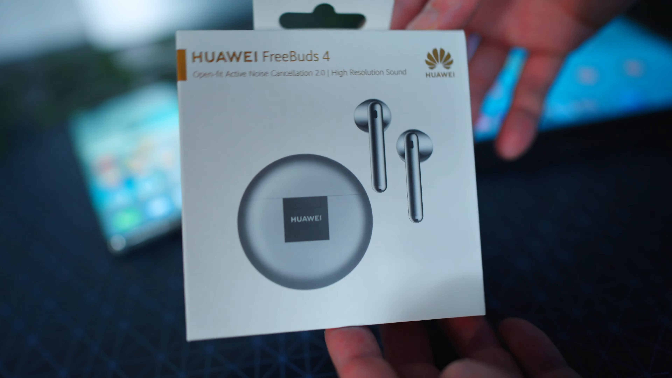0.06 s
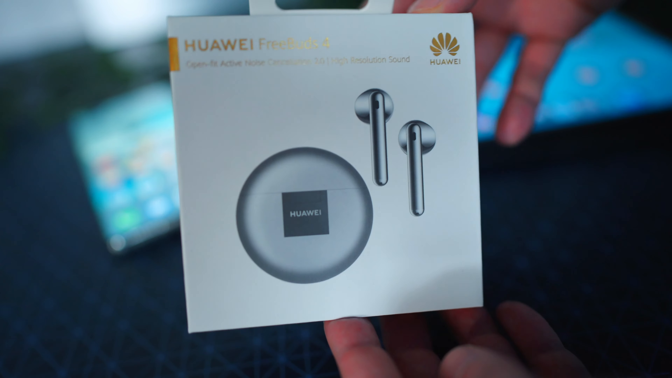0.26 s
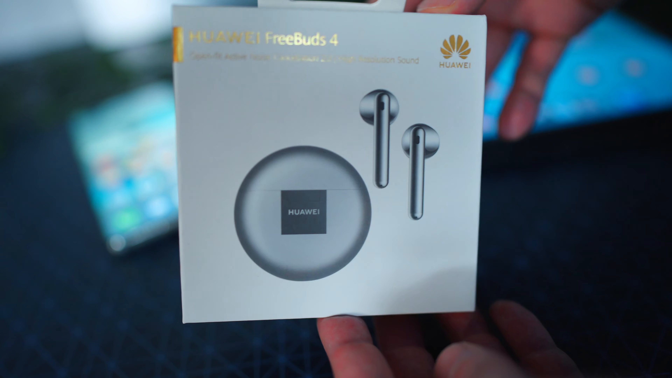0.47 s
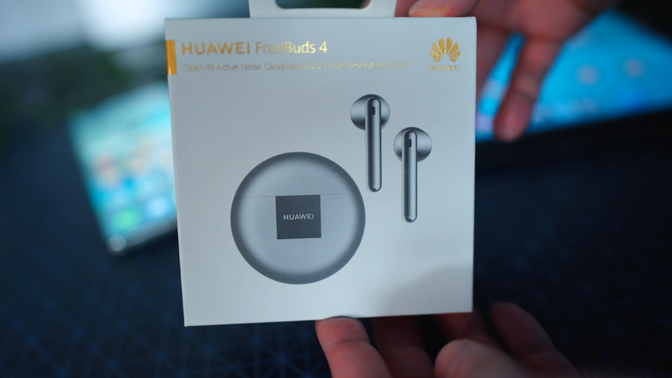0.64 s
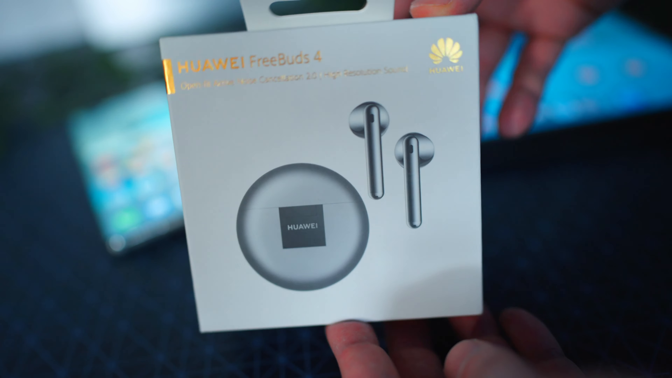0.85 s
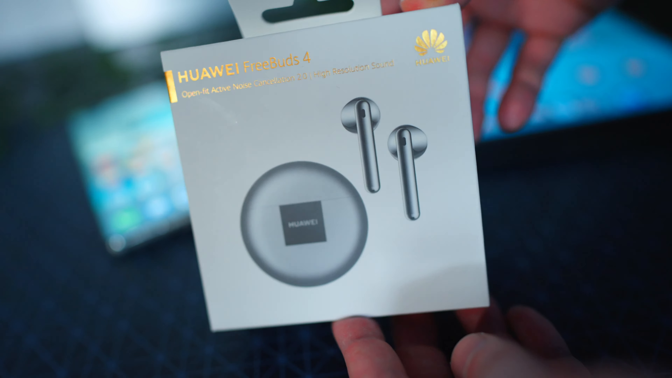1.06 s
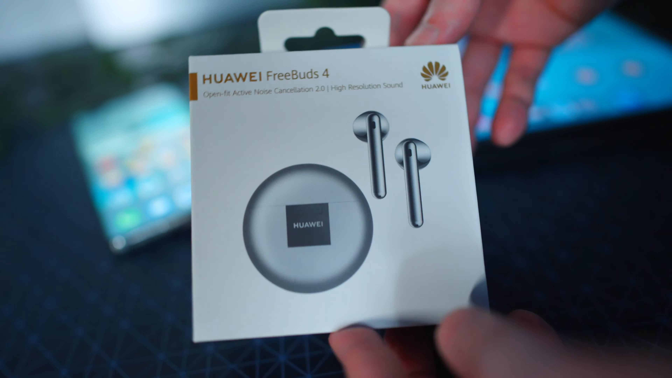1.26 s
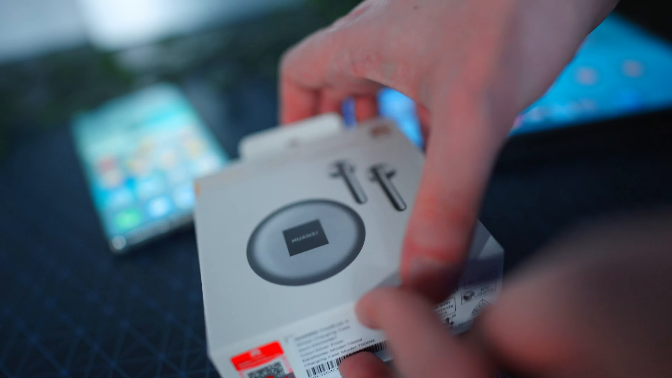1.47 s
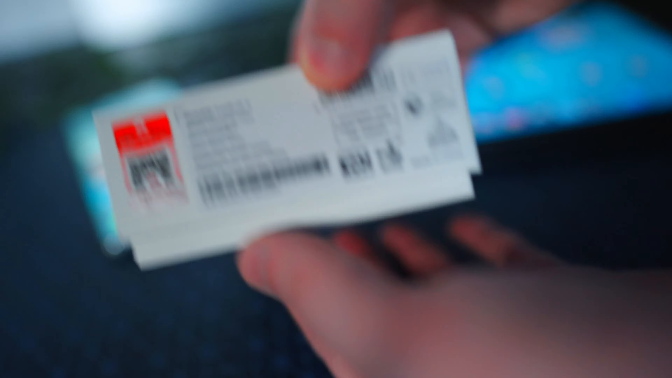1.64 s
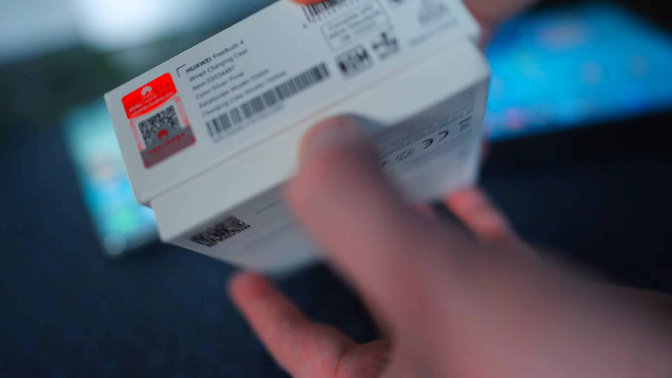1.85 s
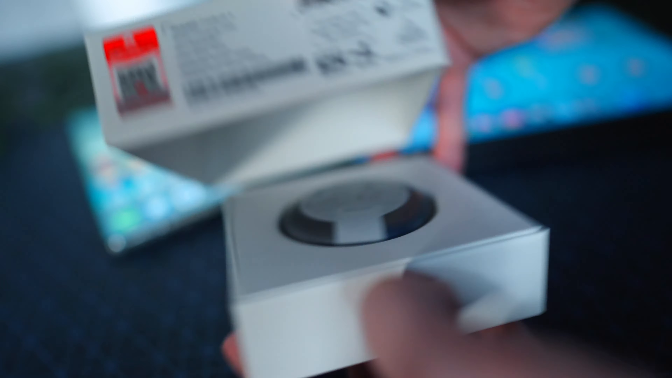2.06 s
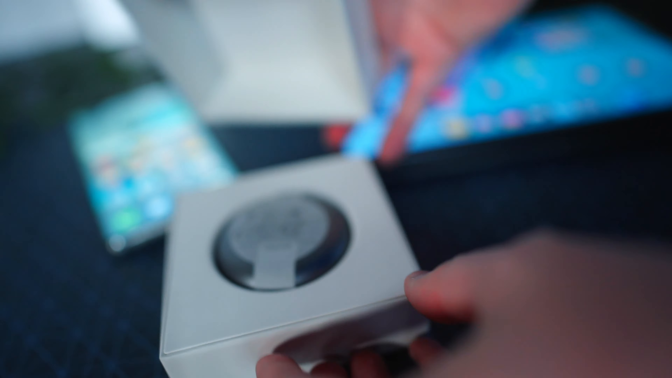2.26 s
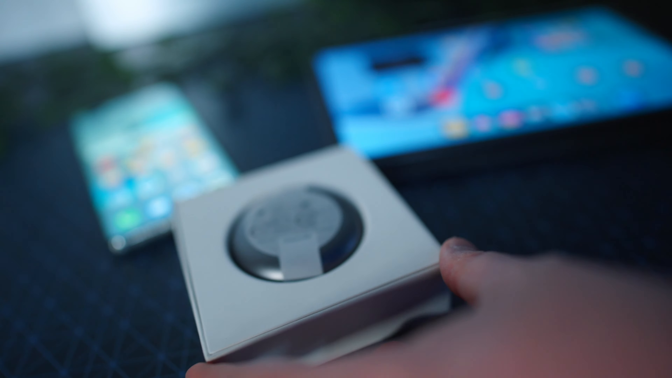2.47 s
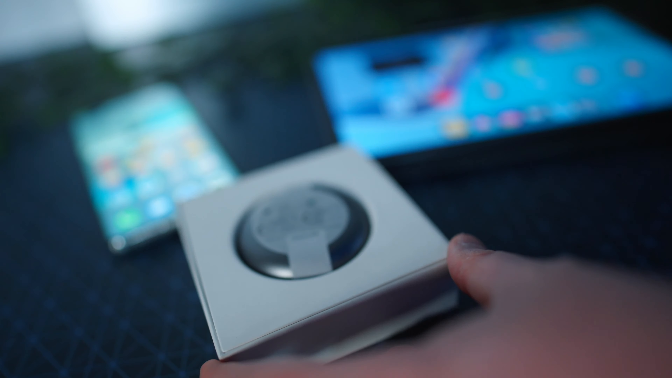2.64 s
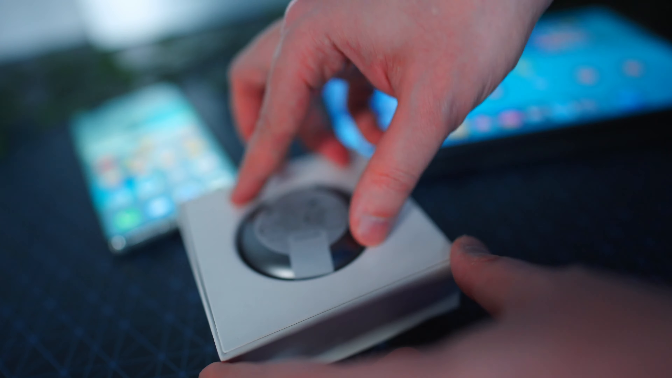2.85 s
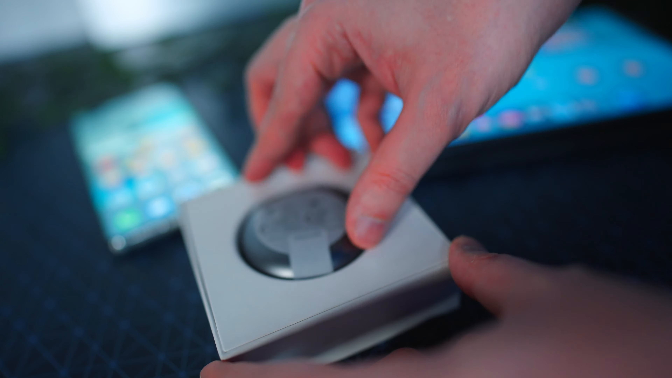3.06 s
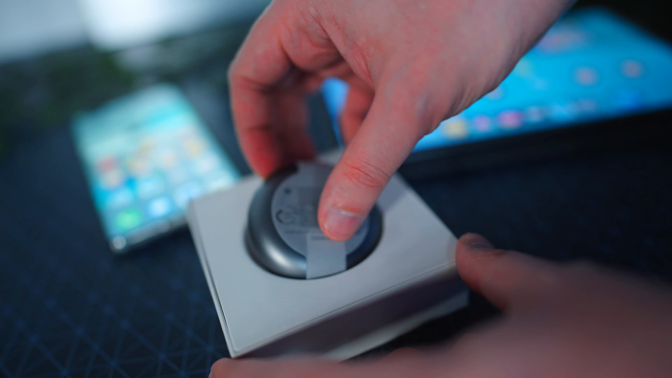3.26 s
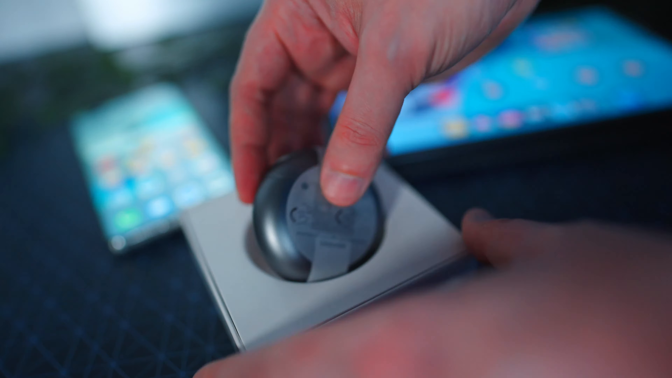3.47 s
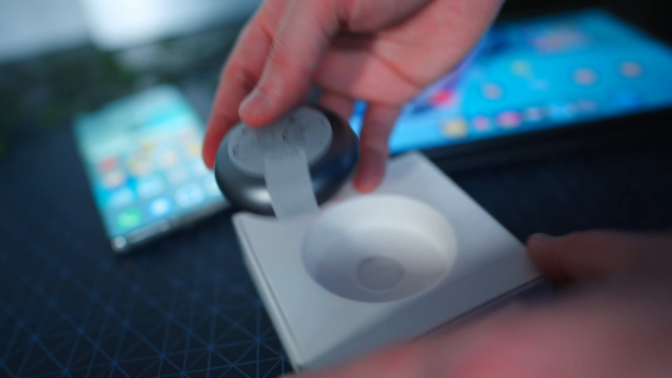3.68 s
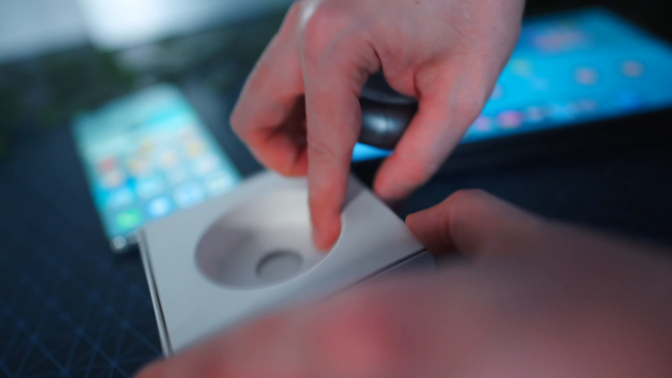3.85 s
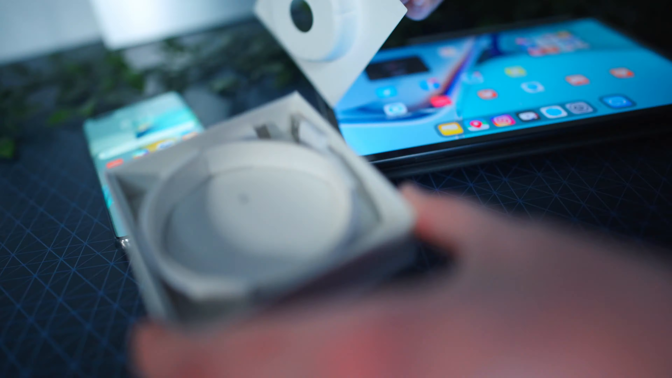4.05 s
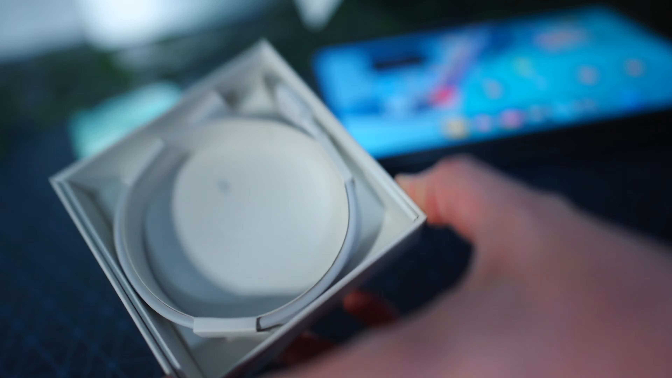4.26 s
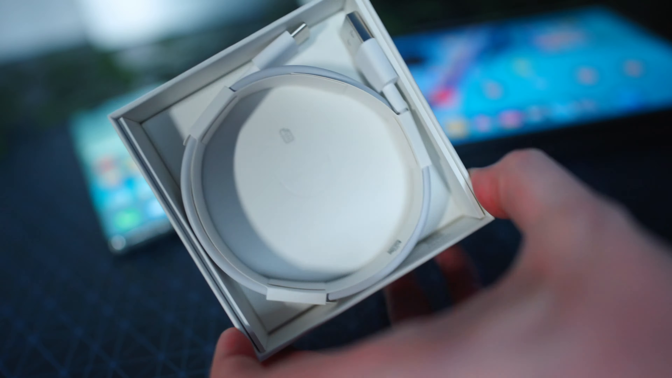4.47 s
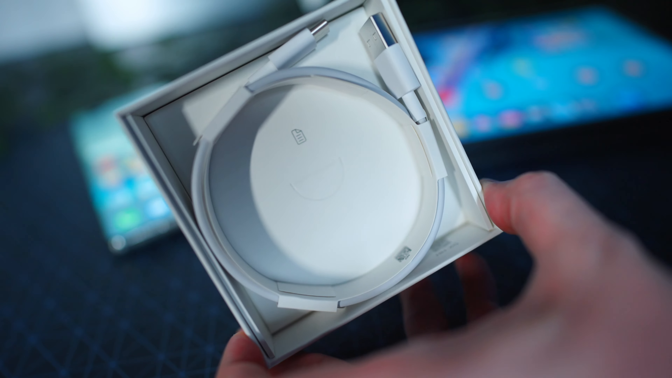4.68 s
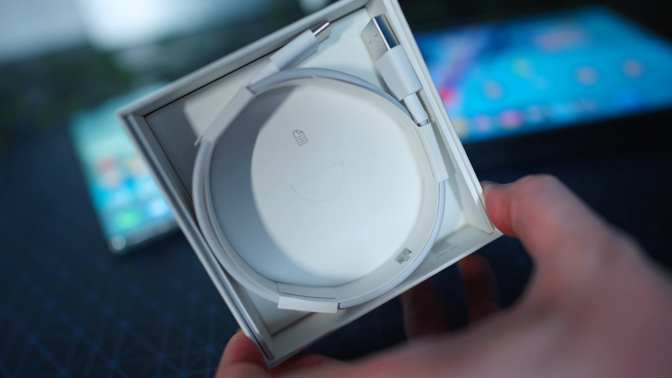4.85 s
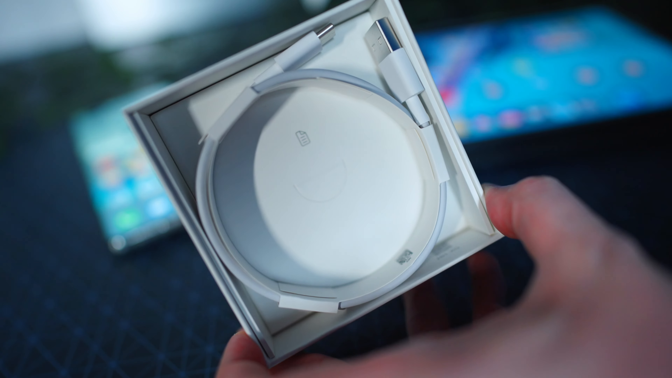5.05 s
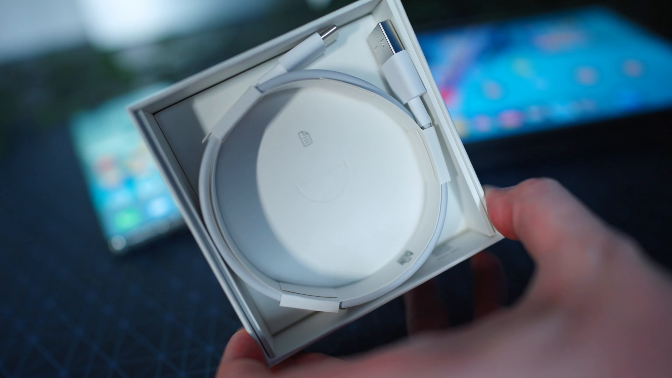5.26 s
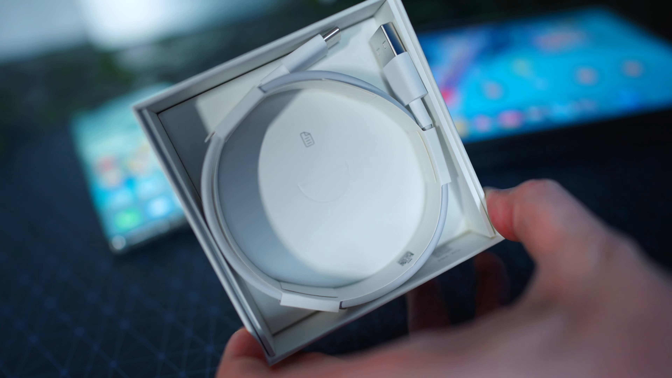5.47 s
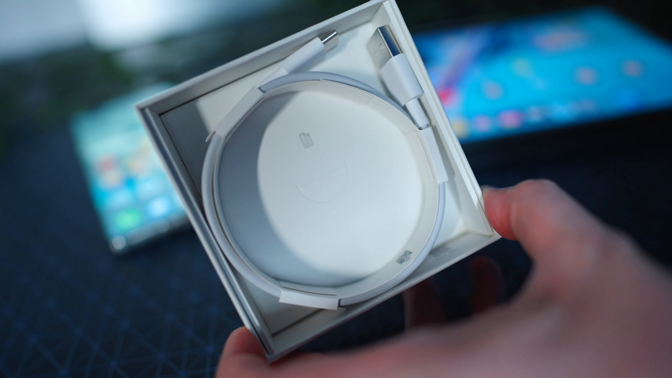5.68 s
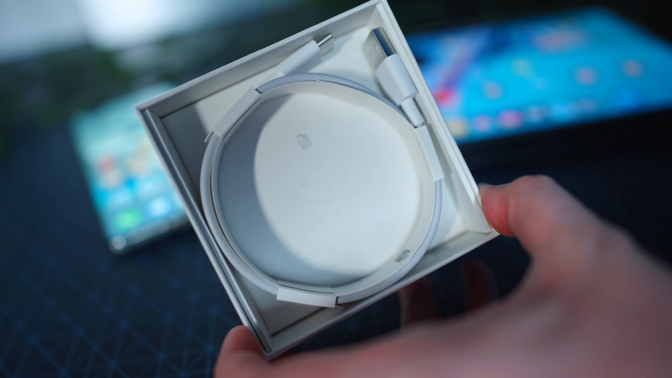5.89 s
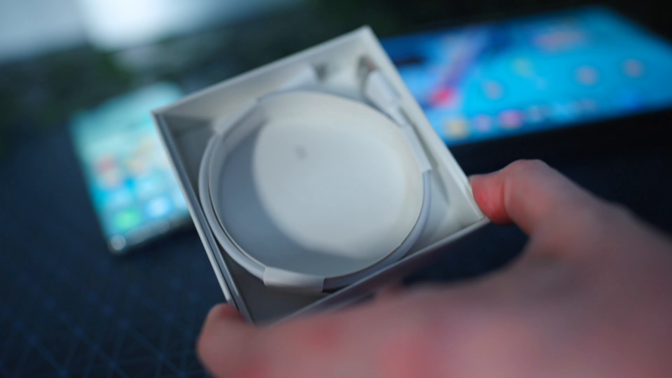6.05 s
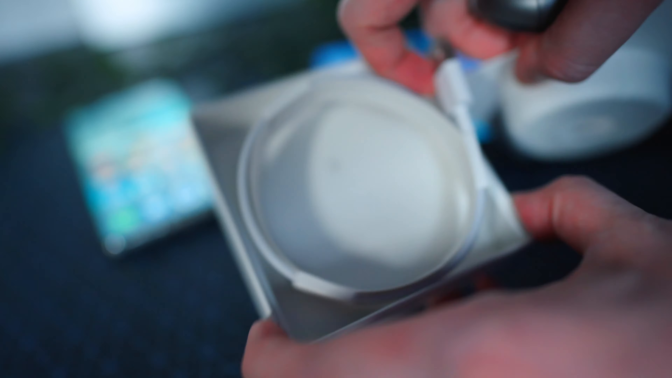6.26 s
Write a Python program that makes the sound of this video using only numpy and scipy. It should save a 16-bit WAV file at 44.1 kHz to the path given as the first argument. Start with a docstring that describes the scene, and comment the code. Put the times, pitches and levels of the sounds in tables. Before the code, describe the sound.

Close microphone in a dry, quiet room. Over a second of faint hiss and soft grip rub, then a quick cluster of hollow cardboard knocks. A brief rising lid scrape ends in firm thumps. Fingers scrub and scuff the card tray as a case is lifted out, with more knocks and a crisp rustle. After a nearly silent gap, a sharp tick and dry scuffs close it.

```python
"""A dry, quiet room: close to the microphone a small stiff cardboard box is picked up from a desk,
its lid slid off, a plastic case lifted from its card tray and the tray pulled out.
Knocks are damped wall swings and thuds that set the hollow box ringing; rubs, scuffs and the sliding lid
are noise from slipping fibres, shaped by card or by resonances. Faint low tones, rumble and hiss lie
underneath, and the level dips briefly three times."""
import sys
import numpy as np
from scipy import signal
from scipy.fft import rfft, irfft
from scipy.io import wavfile
from scipy.ndimage import uniform_filter1d

SR = 44100
rng = np.random.default_rng(int(sys.argv[2]) if len(sys.argv) > 2 else 0)


def materialize(psi):
    """Save the field psi as 16-bit PCM at rate SR to the path in sys.argv[1].

    A 1-D psi becomes a single channel; in a 2-D psi each row is a channel.
    """
    bounded = np.clip(np.atleast_2d(psi).T, -1, 1)
    quanta = np.round(bounded * 32767).astype(np.int16)
    wavfile.write(sys.argv[1], SR, quanta)


N = 278712
TIME = np.arange(N) / SR

# All ring times are the time to fall by 60 dB.
# faint rub of the hand that holds the box: time_s, rub level_db (straight lines between the points)
GRIP = [(0, -79), (.33, -71.5), (.55, -79), (.95, -75), (1.1, -87), (1.45, -69.5), (3.0, -78.5),
        (4.05, -63), (4.6, -90.5), (5.3, -87.5), (5.95, -66), (6.05, -64.5)]
GRIP_BODY_DB, GRIP_FIZZ_DB = -4.5, -4.5  # relative to the rub
# strokes of fingers, sleeve and card: peak_s, rub level_db, length_s,
# hollow body_db and fizz_db, both relative to the rub
STROKES = [(1.37, -63, 0.024, -5, -3), (1.43, -65, 0.03, 15, -22), (1.467, -56, 0.075, 7, -11.5),
           (1.591, -55.5, 0.027, 23, -3), (1.65, -51.5, 0.043, 9.5, -6), (1.807, -71, 0.014, 14, 11),
           (2.065, -39, 0.031, -4, -12), (2.125, -56, 0.044, 15.5, 1.5), (2.203, -55.5, 0.045, 15.5, -14),
           (2.266, -46.5, 0.04, 2.5, -6.5), (2.389, -50.5, 0.034, -15, -8.5),
           (2.484, -57.5, 0.1, 1.5, -10.5), (2.66, -53, 0.03, 11.5, -6), (2.78, -67, 0.11, -8, -3),
           (2.916, -52, 0.022, -5, -7), (2.965, -59, 0.098, 2, -10), (3.049, -43, 0.017, 1.5, -12),
           (3.076, -42.5, 0.034, -6, -8), (3.11, -48.5, 0.02, 2, -5), (3.146, -47, 0.034, -6.5, -4),
           (3.179, -55, 0.046, 4, -6.5), (3.241, -49.5, 0.022, 4.5, -9.5), (3.28, -51.5, 0.024, 4, -10.5),
           (3.311, -42, 0.018, 0.5, -10.5), (3.335, -47.5, 0.026, -4, -4.5), (3.374, -54, 0.032, 7.5, -13),
           (3.406, -40.5, 0.017, -2, -5.5), (3.448, -42.5, 0.02, -7, -6.5), (3.5, -42.5, 0.027, 4, -5.5),
           (3.54, -48.5, 0.041, -4, 0.5), (3.67, -44, 0.063, 0.5, -12), (3.767, -42, 0.043, -0.5, -11),
           (3.791, -44.5, 0.037, -2, -17), (3.836, -54.5, 0.054, 11, -19), (3.876, -43, 0.031, -7, -3.5),
           (3.91, -37.5, 0.024, 1, -5), (3.937, -39, 0.058, -10, -7), (3.988, -42, 0.03, -2, -1.5),
           (4.01, -47, 0.019, 1.5, 0), (4.053, -63, 0.033, -6, 0.5), (4.124, -57.5, 0.025, -9, -1.5),
           (4.263, -66.5, 0.032, 5.5, 3.5), (4.323, -59.5, 0.031, -5, -11), (4.496, -67.5, 0.019, -1.5, 9),
           (6.144, -47.5, 0.023, -1.5, -10.5), (6.191, -51, 0.016, -30.5, -4.5),
           (6.264, -49, 0.053, -11, -10), (6.315, -41, 0.036, -12, -9)]
# every stroke: share of its length spent swelling, roundness of its top (1 pointed, 2 bell)
STROKE_RISE, STROKE_ROUND = 0.54, 1.37
# colour of rubbed card, before its bands are levelled: pitch_hz, level_db
CARD_COLOUR = [(200, -4.5), (380, 20), (500, 17.5), (635, 14), (800, 10), (1100, 3), (1400, 3), (2200, 1.5),
               (3000, -1.5), (3800, -3), (4700, -19), (5500, -21), (12000, -28.5), (16000, -40.5)]
# colour of the inner tray under fingers and plastic case, before its bands are levelled: pitch_hz, level_db
TRAY_COLOUR = [(200, -23), (370, 0), (510, -1), (740, 1.5), (1050, 0), (1300, -4.5), (1800, -3.5),
               (2600, -6.5), (3750, -7), (4700, -19.5), (6100, -26), (11000, -31.5), (12800, -31),
               (16000, -43)]
TRAY_FROM_S = 2.86  # the lid is off and the rubbing moves to the tray
# the hands rumble as they rub: level at a hollow-body level of -40 dB, dB of rumble per dB of body
HAND_DB, HAND_FOLLOW = -49.5, 0.34
# low rumble of the room: time_s, level_db (straight lines between the points)
RUMBLE = [(0, -58), (1.04, -62.5), (1.1, -98), (1.7, -64), (4.62, -61), (4.7, -58.5), (5.95, -57),
          (6.05, -65)]
# colour of the rumble of room and hands: pitch_hz, level_db
RUMBLE_COLOUR = [(20, -40.5), (40, -37), (65, -9.5), (100, -6), (150, -2.5), (210, -2.5), (280, -4),
                 (360, -15.5), (500, -13), (900, -67.5)]
# background hiss: time_s, level_db (straight lines between the points)
HISS = [(0, -70), (1.04, -69), (1.08, -79.5), (4.63, -72), (4.66, -66.5)]
# colour of the hiss: pitch_hz, level_db
HISS_COLOUR = [(100, -8), (330, -8.5), (600, -3), (1100, -7), (1700, -16.5), (3800, -19.5), (5000, -22),
               (12500, -24), (16000, -28.5)]
# drags, scuffs and chirps of card and fingers: peak_s, level_db, rise_s, fall_s, pitch_hz, width_hz
SCUFFS = [(.33, -53, 0.02, 0.034, 272, 180), (.84, -55, 0.14, 0.15, 340, 214),
          (.85, -73.5, 0.15, 0.098, 3930, 600), (1.369, -44, .002, 0.005, 3500, 1000),
          (1.456, -56, 0.0063, 0.0078, 12500, 4020), (1.49, -34.5, 0.003, 0.0039, 435, 300),
          (1.5195, -55, .001, 0.0044, 8040, 900), (1.642, -50, 0.00055, 0.0016, 4170, 3500),
          (1.673, -45.5, 0.0014, 0.0027, 2540, 2970), (2.126, -34, 0.0066, 0.0083, 880, 785),
          (2.632, -45.5, 0.00091, 0.0024, 3600, 1500), (2.914, -40.5, 0.0063, 0.0055, 775, 470),
          (3.073, -42, 0.0022, 0.0061, 2280, 1800), (3.089, -42, 0.0038, 0.0063, 3900, 130),
          (3.183, -49.5, 0.0071, 0.0068, 3920, 170), (3.897, -41.5, 0.0031, 0.002, 3500, 3000),
          (3.9155, -39, 0.0016, 0.0012, 2700, 4330), (4, -33.5, 0.0024, 0.0081, 4600, 4830),
          (4.015, -39.5, 0.0094, .011, 387, 300), (4.337, -43, .002, .004, 3600, 900),
          (4.4251, -54.5, 0.00032, 0.0013, 6350, 9000), (4.495, -57.5, 0.01, 0.0086, 3230, 450),
          (6.074, -48.5, 0.01, 0.039, 4880, 2650), (6.104, -41, 0.0099, 0.0077, 3800, 2340),
          (6.1159, -27.5, 0.00059, 0.0032, 2730, 395), (6.1173, -35, 0.00067, 0.0029, 5150, 3370),
          (6.134, -44, 0.0064, 0.0098, 6440, 3000), (6.272, -43, 0.023, 0.019, 3480, 1070)]
# contacts on the box: start_s, wall level_db, wall pitch_hz, wall ring_s,
# edge crack level_db, crack pitch_hz, thud level_db, crushed fibres level_db
KNOCKS = [(1.2957,-42.5,360,0.078,-60,1930,-29,-63), (1.3151,-51,341,.051,-66,2400,-27.5,-68),
          (1.3918,-15.5,515,0.016,-33.5,1480,-30,-30), (1.3997,-24.5,437,0.0057,-46,1240,-23.5,-46),
          (1.519,-19.5,610,0.0087,-39,1380,-44,-64), (1.5218,-29,408,0.055,-27,1320,-65,-62),
          (1.5279,-23,536,0.012,-34,957,-24.5,-59), (1.535,-17.5,434,0.0067,-49,1510,-30,-37),
          (1.5499,-11.5,486,0.003,-17,1330,-21.5,-29), (1.5534,-14.5,352,0.0059,-37,1530,-27,-53),
          (1.5627,-26,581,0.0077,-39,1980,-33,-53), (1.5811,-24.5,515,.014,-43,2000,-39,-51),
          (1.5875,-25,360,0.0046,-53,1500,-55,-52), (1.5964,-26.5,626,0.015,-36,1950,-37,-50),
          (2.0544,-14,295,0.013,-17,885,-17,-26.5), (2.0625,-18,212,0.0049,-33,2000,-27,-35),
          (2.1325,-10.5,580,0.0046,-12,1040,-21.5,-40), (2.135,-34,676,0.01,-25.5,1200,-31,-46),
          (2.1514,-26.5,610,0.02,-22.5,980,-31,-43), (2.2703,-13,563,0.017,-23,1710,-20,-36),
          (2.2727,-21,507,0.023,-14.5,1410,-22,-27), (2.6303,-37.5,430,0.033,-40.5,3400,-58,-51),
          (2.6674,-15.5,550,0.007,-29.5,830,-67,-57), (2.6937,-21.5,416,0.028,-39.5,1130,-36,-46),
          (2.7023,-27,454,0.012,-69,1500,-38,-69), (2.8875,-42,588,0.05,-54,2200,-47,-46),
          (3.3414,-29.5,510,0.0036,-53,1470,-49,-51), (3.5016,-20,473,0.005,-23.5,1800,-42,-36),
          (3.8539,-17,650,0.0022,-32,1040,-33,-25.5), (3.8563,-19,510,0.02,-32.5,1600,-31,-29),
          (3.867,-19,414,0.0074,-17,1000,-31,-50), (3.873,-20,620,0.003,-34,1210,-32,-41),
          (3.942,-32,308,0.0085,-48,1880,-64,-47), (4.3362,-48,680,0.01,-36,1500,-48,-35),
          (6.2026,-33.5,566,0.028,-27,1500,-63.5,-24.5), (6.3082,-64.5,844,0.0058,-28,2580,-65,-26)]
# hollow thud of the whole box: pitch and ring time
THUD_HZ, THUD_T60_S = 156.2, 0.058
# the stiff edge stops at once, the fibres crunch a little longer: ring times, and the crunch's build-up
CRACK_T60_S, CRUSH_T60_S, CRUSH_RISE_S = 0.0071, 0.018, 0.00095
# crushed fibres at the point of contact: pitch_hz, level_db
CRUSH_COLOUR = [(300, -17), (900, -4.5), (2500, 7.5), (3900, -1.5), (4700, -16.5), (8500, -21.5),
                (16000, -37)]
# modes the hollow box rings on with after every contact: pitch_hz, level_db, ring_s
BOX_MODES = [(358, -1, 0.081), (461, -0.5, 0.041), (714, -5, 0.029), (1097, -0.5, 0.066), (1510, -15, 0.09),
             (2120, 1, 0.04), (2900, -13.5, 0.052), (3580, 0, .04)]
# the sliding lid until it comes free, silent before and after:
# time_s, rub level_db (straight lines between the points)
LID = [(1.84, -74), (1.905, -55.5), (1.975, -57.5), (2.005, -46), (2.034, -50), (2.049, -41), (2.072, -56),
       (2.11, -73.5)]
LID_BODY_DB, LID_FIZZ_DB = 6.5, -17.5  # relative to the rub
# resonances of the sliding lid: pitch_hz at its loudest moment, width_hz, level_db relative to the rub
LID_MODES = [(510, 190, 9), (880, 440, 1.5), (2150, 590, -5)]
LID_GLIDE = 3.8  # octaves per s: they rise while the overlap of lid and box shrinks
# low ringing under the handling: peak_s, level_db, rise_s, fall_s, pitch_hz, waver_hz
DRONES = [(2.79, -46, 0.042, 0.083, 167.8, 6.1), (3.21, -48.5, 0.035, 0.034, 160.3, 8.77),
          (3.3, -53, 0.27, 0.73, 77.1, 6.1), (4.019, -37.5, 0.01, 0.013, 160.7, 6.5)]
# the level dips briefly: start_s, recovery_s
DIPS = [(1.05, 0.05), (4.63, 0.059), (5.967, 0.074)]
BAND_LIMIT_HZ = 15900


def amp(db):
    """Decibels to gain."""
    return 10 ** (np.asarray(db) / 20)


def unit(x):
    """Scales to rms 1."""
    return x / np.sqrt(np.mean(x ** 2) + 1e-20)


def add(mix, start_s, sound):
    """Mixes a sound in at a time."""
    part = mix[max(round(start_s * SR), 0):][:len(sound)]
    part += sound[:len(part)]


def colour(x, points):
    """Filters by a spectrum drawn on a log-frequency axis."""
    hz, db = np.transpose(points)
    f = np.fft.rfftfreq(len(x), 1 / SR)
    gain = amp(np.interp(np.log(f + 1), np.log(hz), db))
    return irfft(rfft(x) * gain, len(x))


def split(x, edges_hz, order=6):
    """Splits into neighbouring bands that sum to the whole."""
    f = np.fft.rfftfreq(len(x), 1 / SR)
    lowpasses = [1 / (1 + (f / hz) ** (2 * order)) for hz in edges_hz]
    below = [0 * f] + lowpasses + [1 + 0 * f]
    return irfft(rfft(x) * np.diff(below, axis=0), len(x))


def wander(hz, size=N):
    """Slow random drift of rms 1, up to about the given rate."""
    f = np.fft.rfftfreq(size, 1 / SR)
    return unit(irfft(rfft(rng.standard_normal(size)) / (1 + (f / hz) ** 4), size))


def swell(peak_s, db, rise_s, fall_s):
    """A level that grows to a peak along a bell curve and dies away exponentially."""
    before = np.maximum(peak_s - TIME, 0) / rise_s
    after = np.maximum(TIME - peak_s, 0) / max(fall_s, 1e-4)
    return amp(db) * np.exp(-before ** 2 - after)


def slips(per_s, spread_db, smooth):
    """Fibres catch and let go: clicks of uneven size over a smooth hiss."""
    sizes = amp(spread_db * np.minimum(rng.exponential(1, N), 4)) * rng.choice([-1, 1], N)
    clicks = sizes * (rng.random(N) < per_s / SR)
    return unit(unit(clicks) + smooth * rng.standard_normal(N))


def lid_level():
    """Gain of the lid's rub, silent outside its slide."""
    return amp(np.interp(TIME, *np.transpose(LID), left=-np.inf, right=-np.inf))


def friction():
    """Power of grip, lid and strokes together over time, as rows of hollow body, rub and fizz."""
    def power(gain, body_db, fizz_db):
        return np.outer(amp([body_db, 0, fizz_db]) ** 2, gain ** 2)

    grip = amp(np.interp(TIME, *np.transpose(GRIP)))
    total = power(grip, GRIP_BODY_DB, GRIP_FIZZ_DB) + power(lid_level(), LID_BODY_DB, LID_FIZZ_DB)
    for peak_s, db, length, body_db, fizz_db in STROKES:
        near = slice(*np.searchsorted(TIME, [peak_s - 4 * length, peak_s + 4 * length]))
        u = (TIME[near] - peak_s) / length
        distance = np.maximum(-u / STROKE_RISE, u / (1 - STROKE_RISE))
        stroke = amp(db) * np.exp(-distance ** STROKE_ROUND)
        total[:, near] += power(stroke, body_db, fizz_db)
    return total


def shifting(x, depth_db, size=512):
    """As the point of contact moves, the card's resonances come and go."""
    overlap = size * 3 // 4
    z = signal.stft(x, nperseg=size, noverlap=overlap)[2]
    patches = rng.standard_normal(z.shape)
    for _ in range(2):
        patches = uniform_filter1d(patches, size=4, axis=0)
        patches = uniform_filter1d(patches, size=7, axis=1)
    return signal.istft(z * amp(depth_db * unit(patches)), nperseg=size, noverlap=overlap)[1][:N]


def rubbing(levels, judder_db=2.0, judder_hz=130, grit_db=-10):
    """Slipping fibres and coarser snags drive the card, then the tray; uneven pressure makes it judder."""
    fibres = slips(per_s=10000, spread_db=-0.5, smooth=0.26)
    snags = slips(per_s=200, spread_db=2.5, smooth=0)
    drive = shifting(fibres + amp(grit_db) * snags, depth_db=2.2)
    pressure = unit(amp(judder_db * wander(judder_hz)))

    def surface(spectrum):
        # hollow body below 900 Hz, rub between, fizz above 4400 Hz
        bands = split(colour(drive, spectrum), (900, 4400), order=4)
        return sum(unit(band) * level for band, level in zip(bands, levels))

    return pressure * np.where(TIME < TRAY_FROM_S, surface(CARD_COLOUR), surface(TRAY_COLOUR))


def crackle(push, crackle_db=-8):
    """Single fibres snap under the stroke: separate bright grains."""
    snaps = slips(per_s=240, spread_db=2.4, smooth=0)
    bright = colour(snaps, [(700, -24), (2200, 14.5), (4000, 3), (6000, -1), (16000, -35)])
    return amp(crackle_db) * push * unit(bright)


def hands(push):
    """The harder the hands rub, the more they rumble through the box."""
    effort = push / amp(-40)
    rumble = unit(colour(rng.standard_normal(N), RUMBLE_COLOUR))
    return amp(HAND_DB) * effort ** HAND_FOLLOW * rumble


def background(curve, spectrum, waver_db):
    """Coloured noise whose level drifts."""
    level_db = np.interp(TIME, *np.transpose(curve)) + waver_db * wander(7.1)
    return amp(level_db) * unit(colour(rng.standard_normal(N), spectrum))


def scuffs():
    """An edge or a fingertip drags for a moment and sounds in one band, narrow for a chirp."""
    drive = slips(per_s=11000, spread_db=4.5, smooth=0.41)
    out = np.zeros(N)
    for peak_s, db, rise_s, fall_s, hz, width in SCUFFS:
        edges = np.clip([hz - width / 2, hz + width / 2], 150, SR / 2 - 500)
        band = signal.butter(2, edges, "band", fs=SR, output="sos")
        out += swell(peak_s, db, rise_s, fall_s) * unit(signal.sosfilt(band, drive))
    return out


def flex(t, hz, t60, rise_cycles=0.19, soft_hz=1000):
    """A damped panel springs back; soft card passes little far above its pitch; peak 1."""
    onset = (1 - np.exp(-t * hz / rise_cycles)) ** 3
    swing = np.gradient(np.sin(2 * np.pi * hz * t) * amp(-60 * t / t60) * onset)
    swing = signal.lfilter(*signal.butter(3, hz + soft_hz, fs=SR), swing)
    return -swing / (abs(swing).max() + 1e-20)


def hollow(x, size=8192):
    """The direct sound and the modes of the box that it sets ringing."""
    t = np.arange(size) / SR
    response = np.zeros(size)
    for hz, db, t60 in BOX_MODES:
        evening = 2 * np.log(1000) / (t60 * SR)  # long rings come out no louder at their pitch
        response += amp(db - 60 * t / t60) * np.cos(2 * np.pi * hz * t) * evening
    return x + signal.fftconvolve(x, response)[:N]


def knocks(size=8192):
    """Each contact flexes a wall, cracks an edge, thumps the whole box and crushes a few fibres."""
    t = np.arange(size) / SR
    crunch = amp(-60 * t / CRUSH_T60_S) * (1 - np.exp(-t / CRUSH_RISE_S))
    thud = flex(t, THUD_HZ, THUD_T60_S)
    blows, fibres = np.zeros((2, N))
    for start_s, wall_db, wall_hz, ring_s, crack_db, crack_hz, thud_db, crush_db in KNOCKS:
        wall = amp(wall_db) * flex(t, wall_hz, ring_s)
        crack = amp(crack_db) * flex(t, crack_hz, CRACK_T60_S)
        add(blows, start_s, wall + crack + amp(thud_db) * thud)
        grain = unit(colour(rng.standard_normal(size), CRUSH_COLOUR))
        add(fibres, start_s, amp(crush_db) * crunch * grain)
    # the knocks carry no deep bass
    no_bass = signal.butter(2, 65, "high", fs=SR, output="sos")
    return signal.sosfilt(no_bass, hollow(blows) + fibres)


def resonate(x, hz, width):
    """A steep resonance that follows the curve hz."""
    turn = np.exp(2j * np.pi * np.cumsum(hz) / SR)
    r = np.exp(-np.pi * width / SR)
    # shift the pitch down to zero, smooth there, shift back
    smoothed = signal.lfilter([(1 - r) ** 2], [1, -2 * r, r * r], x / turn)
    return (turn * smoothed).real


def lid(judder_db=2.5, judder_hz=90):
    """The tight lid sticks and slips along the box, and its resonances rise as it works free."""
    times, db = np.transpose(LID)
    since_peak = np.clip(TIME, times[0], times[-1]) - times[np.argmax(db)]
    glide = 2 ** (LID_GLIDE * since_peak)
    drive = slips(per_s=600, spread_db=1.5, smooth=0.4)
    sliding = sum(amp(mode_db) * unit(resonate(drive, hz * glide, width))
                  for hz, width, mode_db in LID_MODES)
    return lid_level() * sliding * unit(amp(judder_db * wander(judder_hz)))


def drones(flutter_db=5.5, flutter_hz=11):
    """Faint low tones that waver, flutter and die away as the box is gripped and moved."""
    tones = np.zeros(N)
    for peak_s, db, rise_s, fall_s, hz, waver in DRONES:
        phase = 2 * np.pi * np.cumsum(hz + waver * wander(18.1)) / SR
        tones += swell(peak_s, db, rise_s, fall_s) * np.sqrt(2) * np.sin(phase)
    return tones * unit(amp(flutter_db * wander(flutter_hz)))


def room(x, desk_db=-13, desk_s=.0032, wall_db=-17, wall_s=0.01, tail_db=-25, t60=0.12):
    """The direct sound, two near reflections and a short, weak tail."""
    t = np.arange(SR // 3) / SR
    tail = rng.standard_normal(len(t)) * (t > .006) * amp(-60 * t / t60)
    response = amp(tail_db) * tail / np.linalg.norm(tail)
    for delay_s, db in ((0, 0), (desk_s, desk_db), (wall_s, wall_db)):
        add(response, delay_s, amp([db]))
    return signal.fftconvolve(x, response)[:N]


def scene():
    """The box in the room, over hand rumble, low tones, room rumble and hiss."""
    levels = np.sqrt(friction())
    body, rub, fizz = levels
    box = rubbing(levels) + crackle(np.sqrt(rub * fizz)) + scuffs() + knocks() + lid()
    rumble = background(RUMBLE, RUMBLE_COLOUR, waver_db=1.06)
    hiss = background(HISS, HISS_COLOUR, waver_db=0.5)
    return (room(box) + hands(body) + drones() + rumble + hiss)[None]


def record(dry):
    """The level drops at each dip and climbs back; then the treble is cut at the band limit."""
    gain = np.ones(N)
    for start_s, recovery_s in DIPS:
        climb = np.clip((TIME - start_s) / recovery_s, .08, 1) ** 2.05
        gain *= np.where(TIME < start_s, 1, climb)
    lowpass = signal.firwin(511, BAND_LIMIT_HZ, window=("kaiser", 9), fs=SR)
    return signal.oaconvolve(dry * gain, lowpass[None], "same")


dry = scene()
out = record(dry)
materialize(out)
```